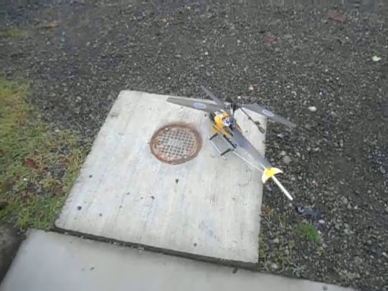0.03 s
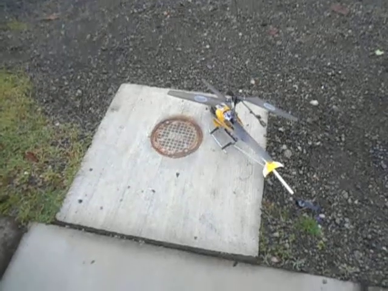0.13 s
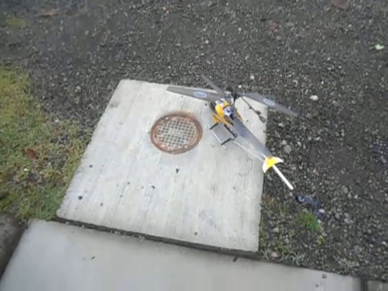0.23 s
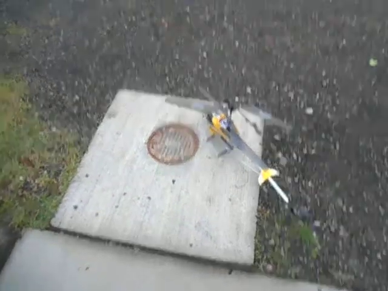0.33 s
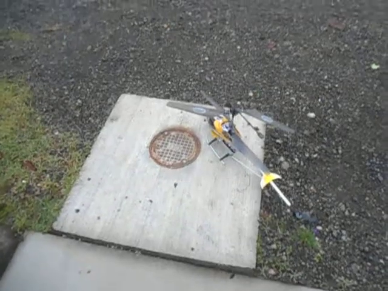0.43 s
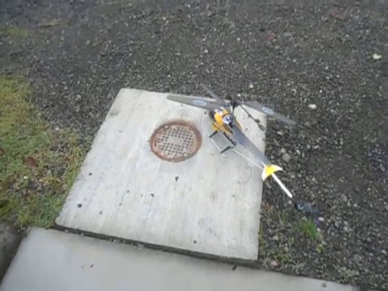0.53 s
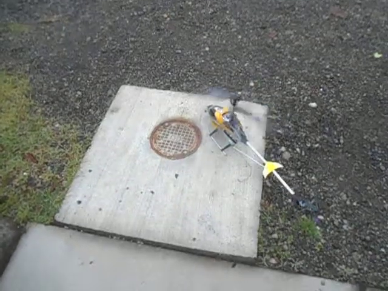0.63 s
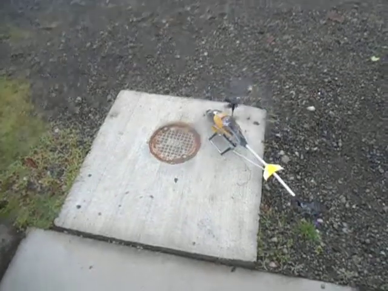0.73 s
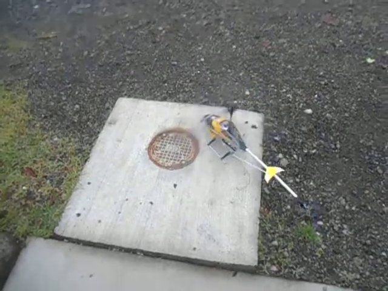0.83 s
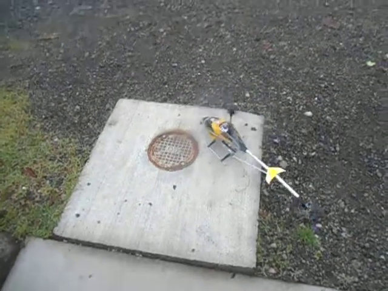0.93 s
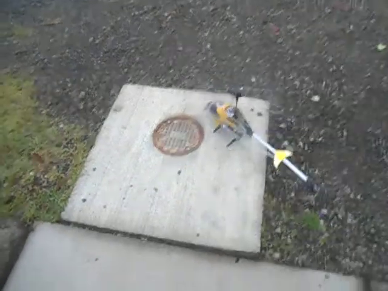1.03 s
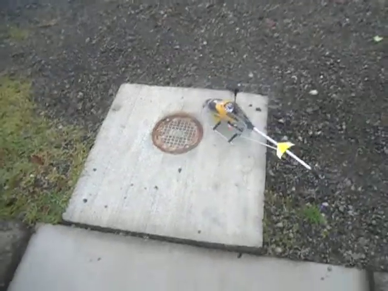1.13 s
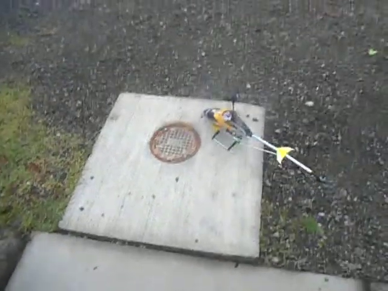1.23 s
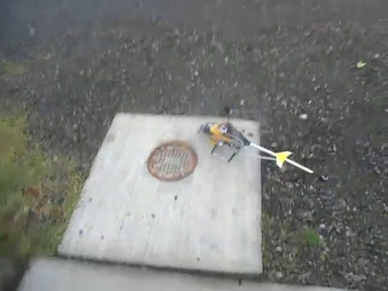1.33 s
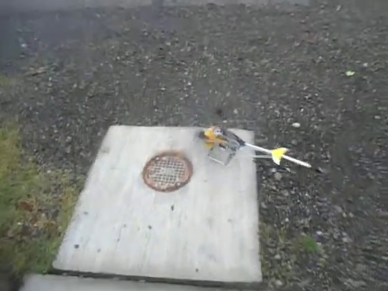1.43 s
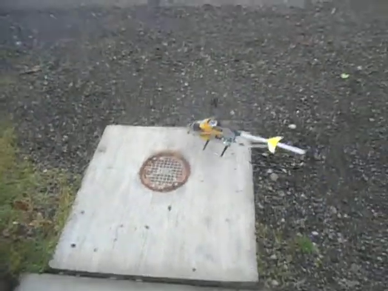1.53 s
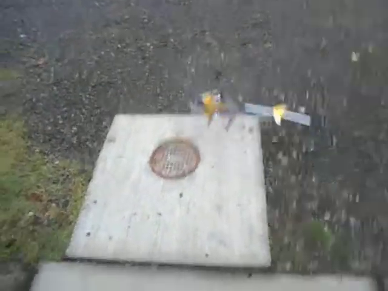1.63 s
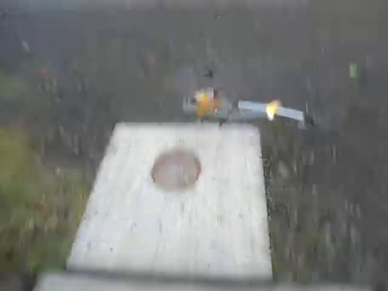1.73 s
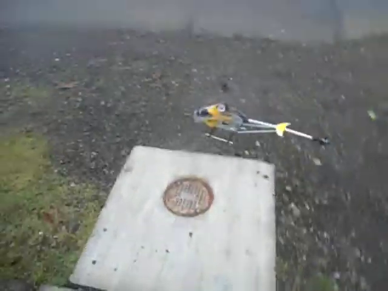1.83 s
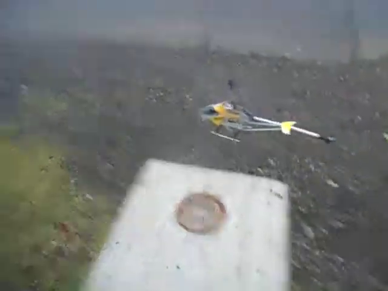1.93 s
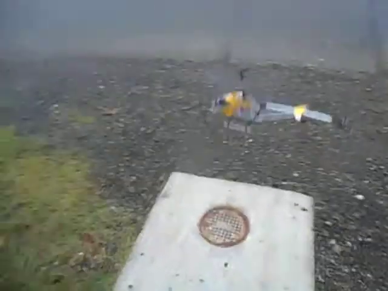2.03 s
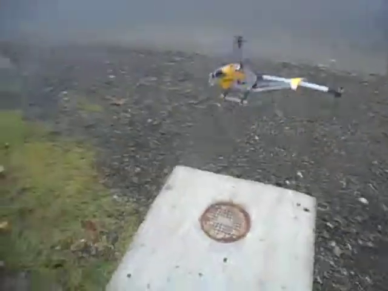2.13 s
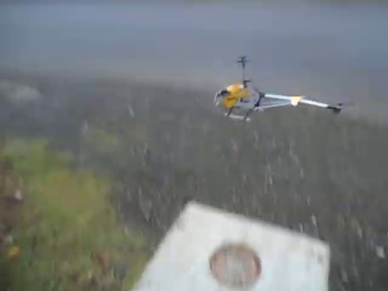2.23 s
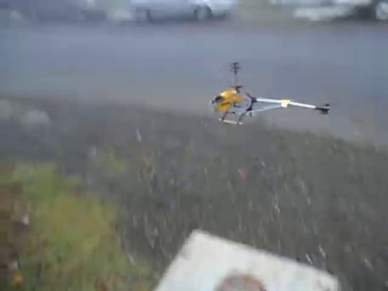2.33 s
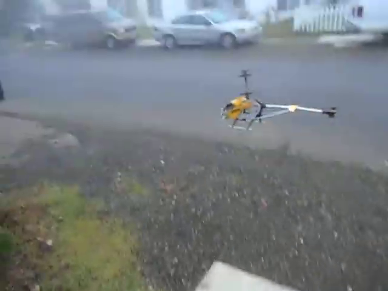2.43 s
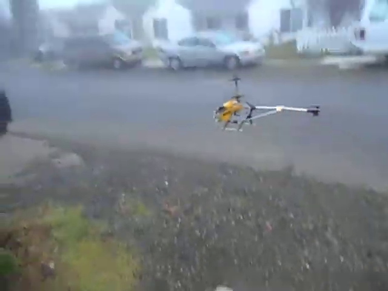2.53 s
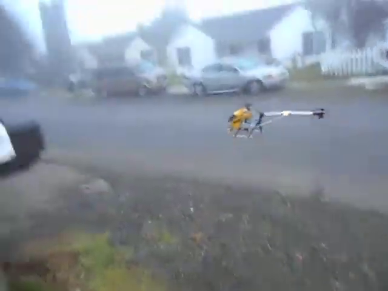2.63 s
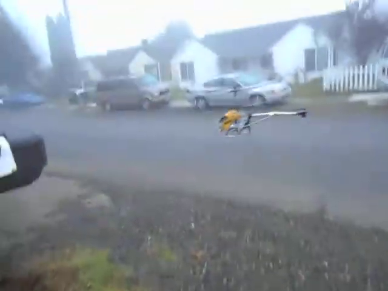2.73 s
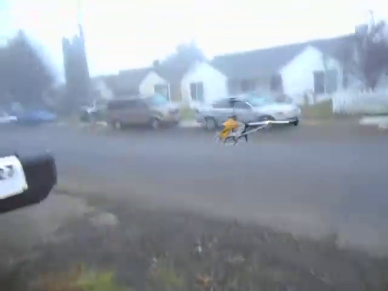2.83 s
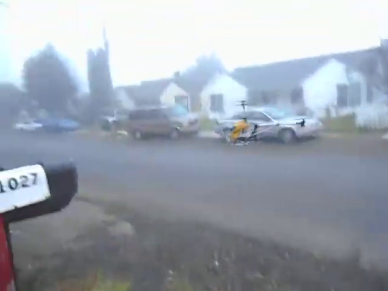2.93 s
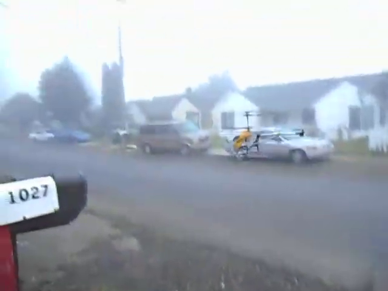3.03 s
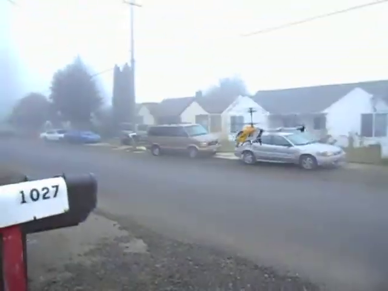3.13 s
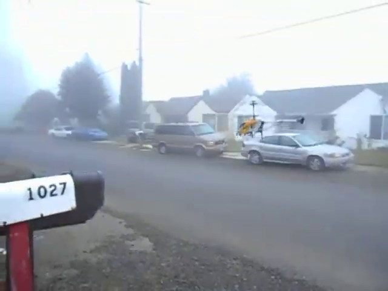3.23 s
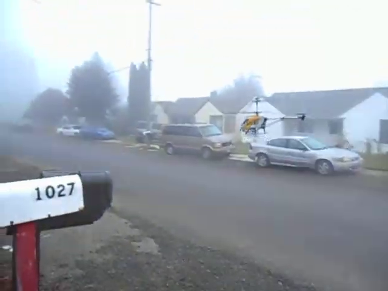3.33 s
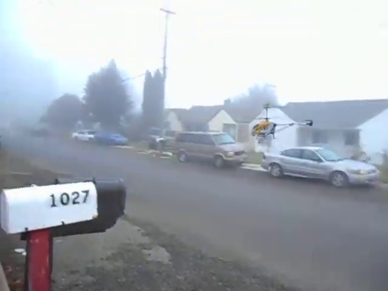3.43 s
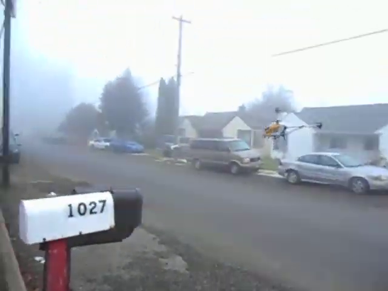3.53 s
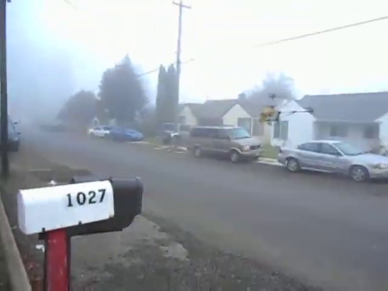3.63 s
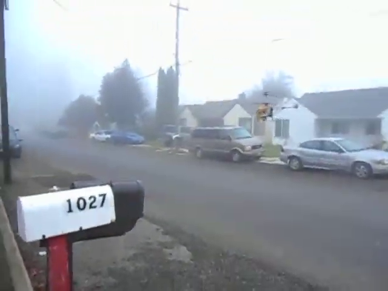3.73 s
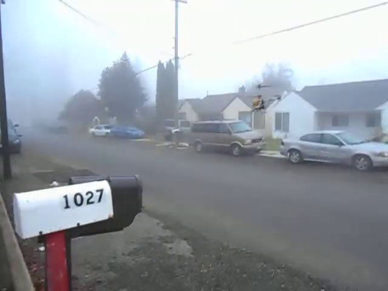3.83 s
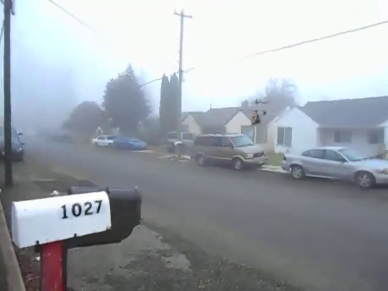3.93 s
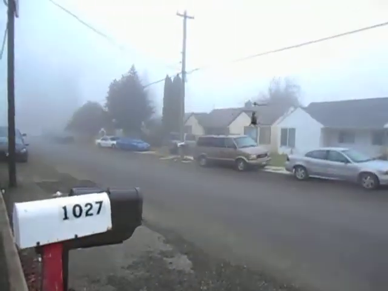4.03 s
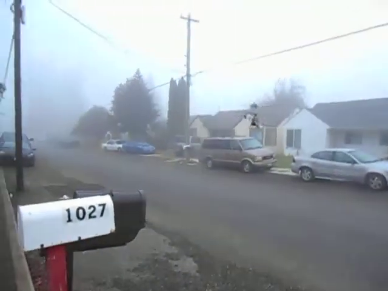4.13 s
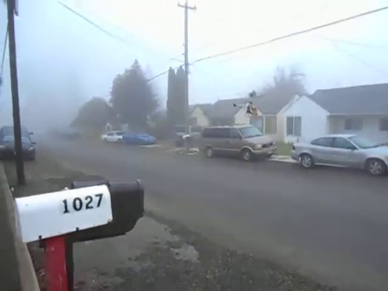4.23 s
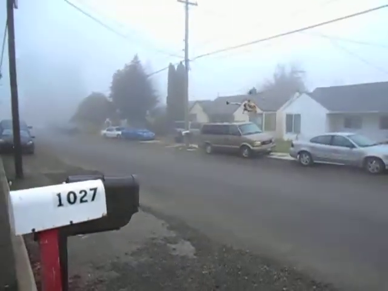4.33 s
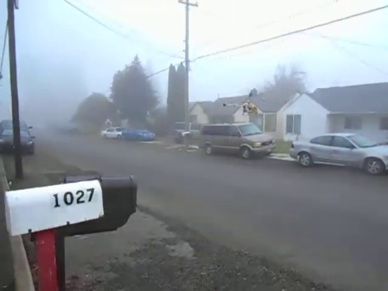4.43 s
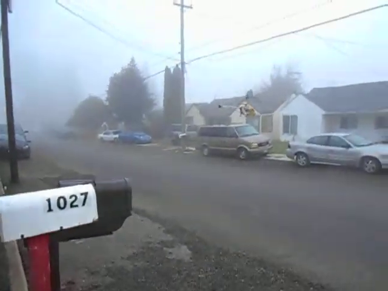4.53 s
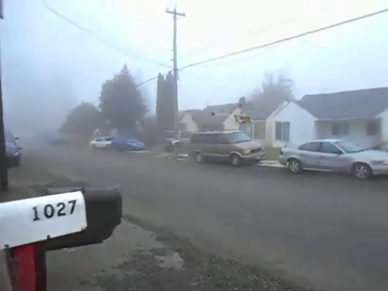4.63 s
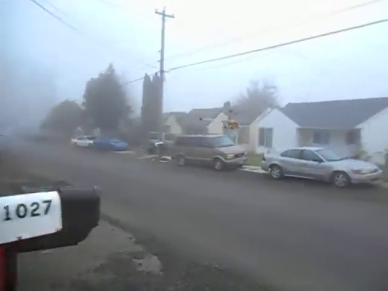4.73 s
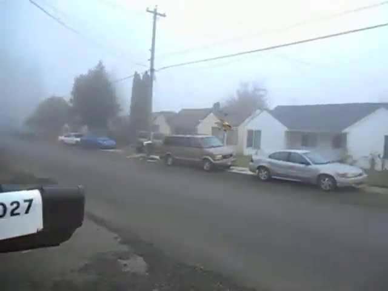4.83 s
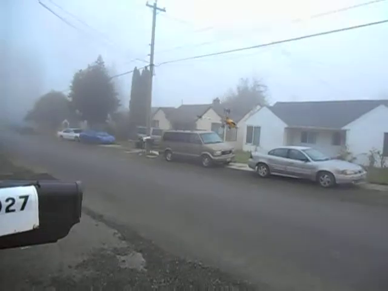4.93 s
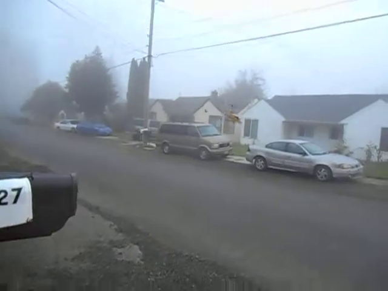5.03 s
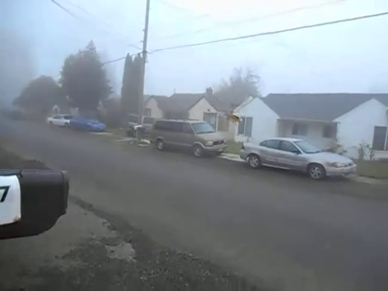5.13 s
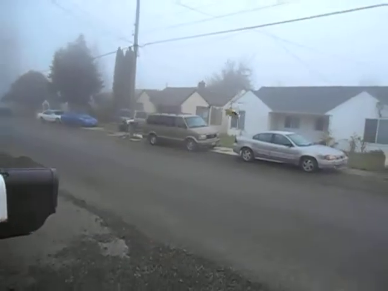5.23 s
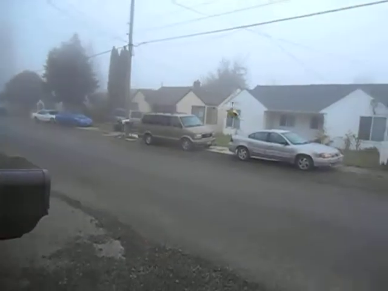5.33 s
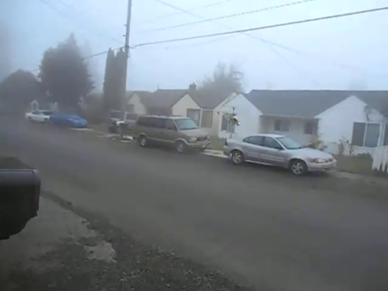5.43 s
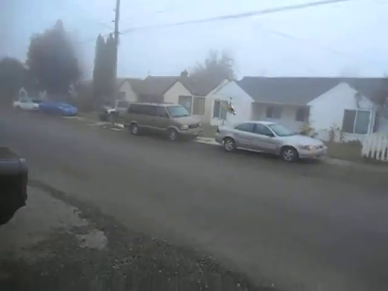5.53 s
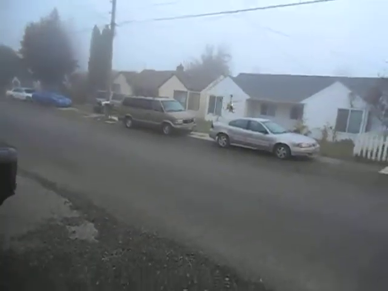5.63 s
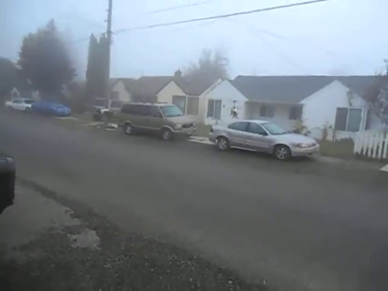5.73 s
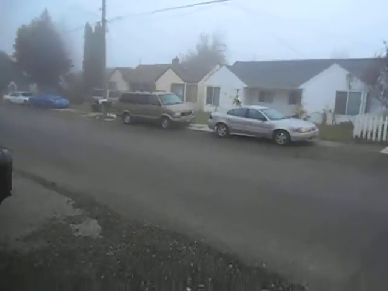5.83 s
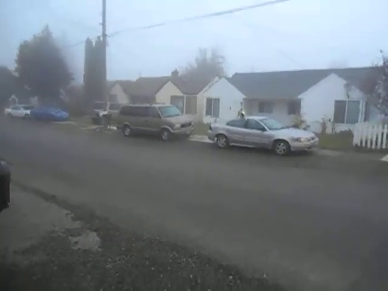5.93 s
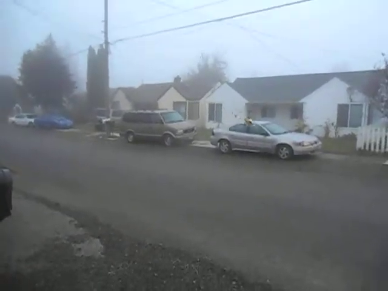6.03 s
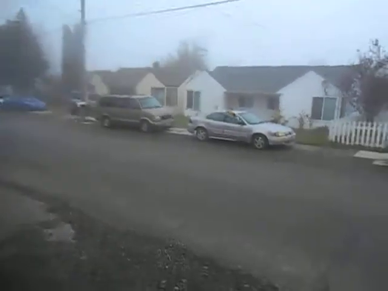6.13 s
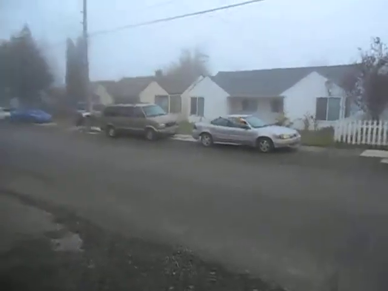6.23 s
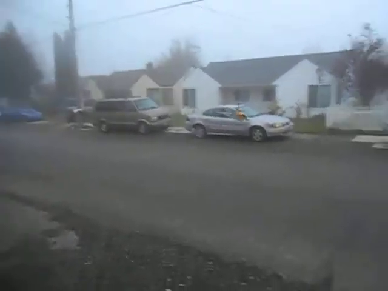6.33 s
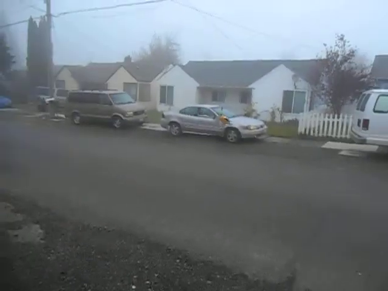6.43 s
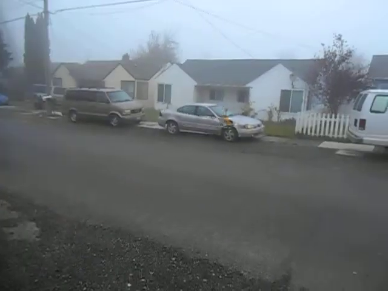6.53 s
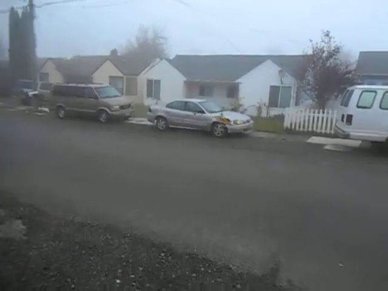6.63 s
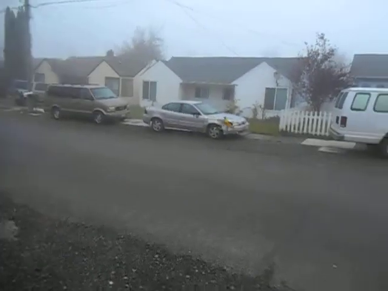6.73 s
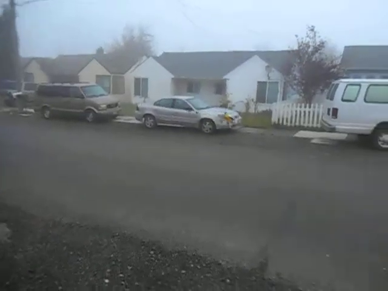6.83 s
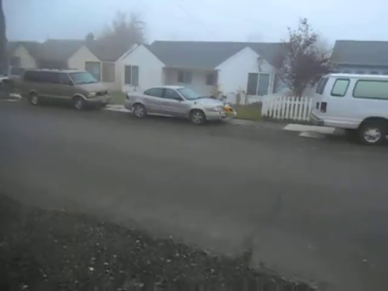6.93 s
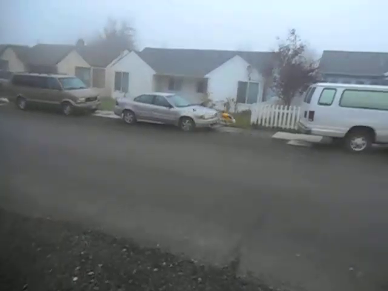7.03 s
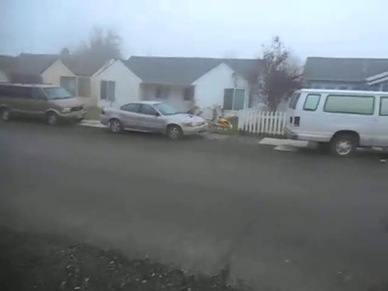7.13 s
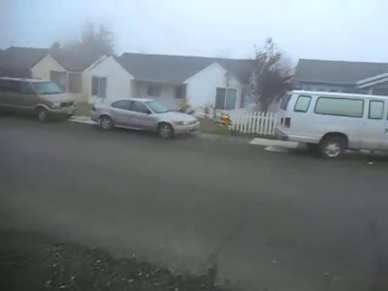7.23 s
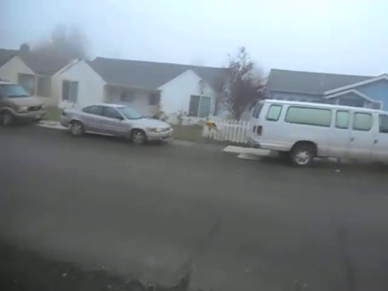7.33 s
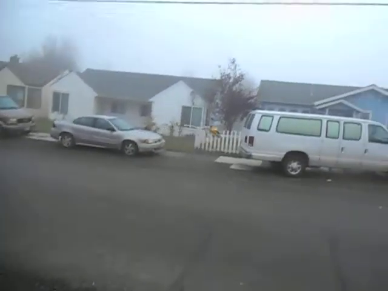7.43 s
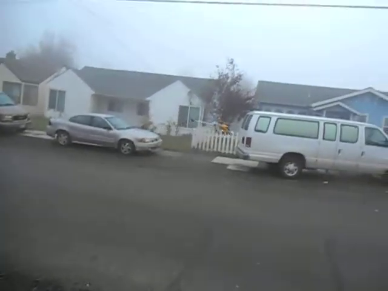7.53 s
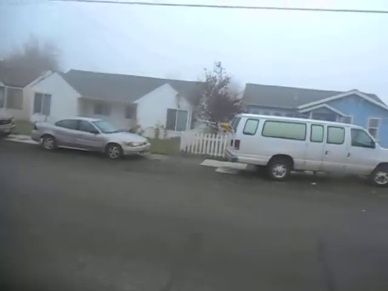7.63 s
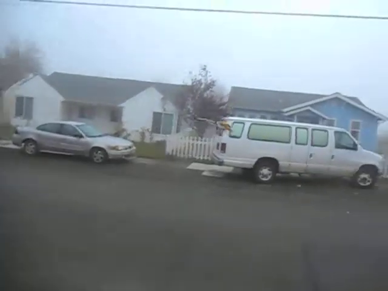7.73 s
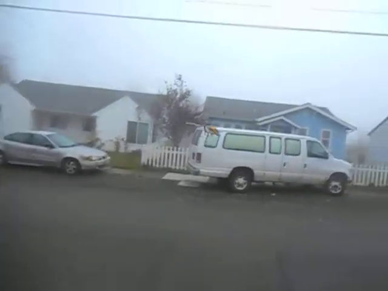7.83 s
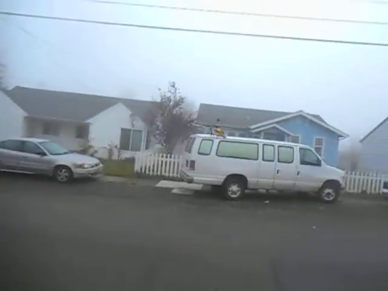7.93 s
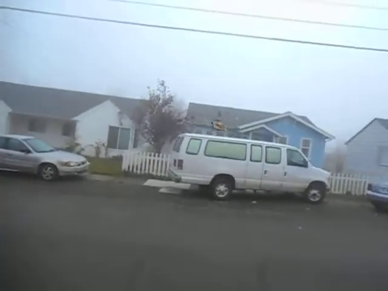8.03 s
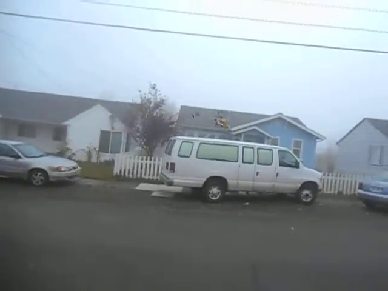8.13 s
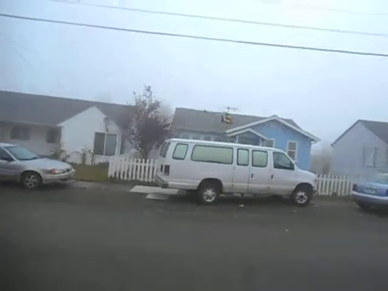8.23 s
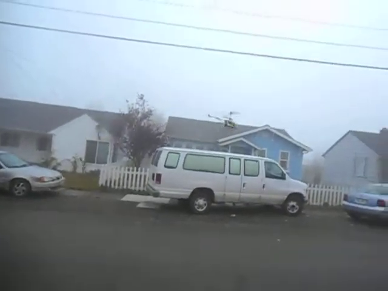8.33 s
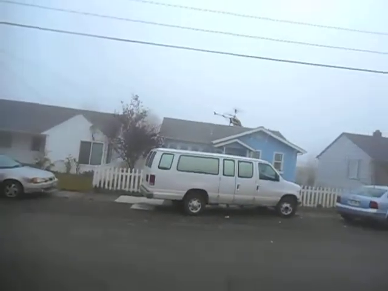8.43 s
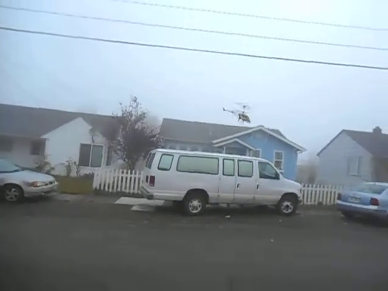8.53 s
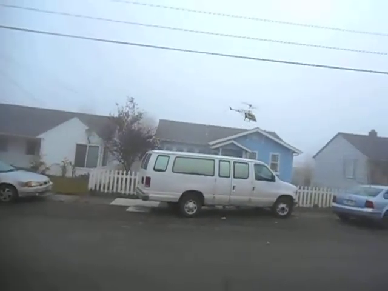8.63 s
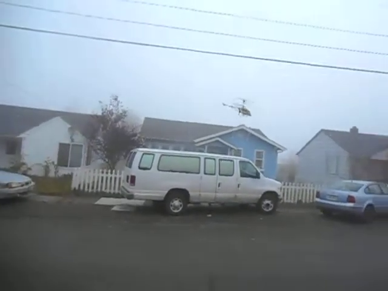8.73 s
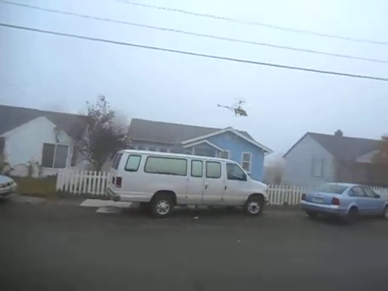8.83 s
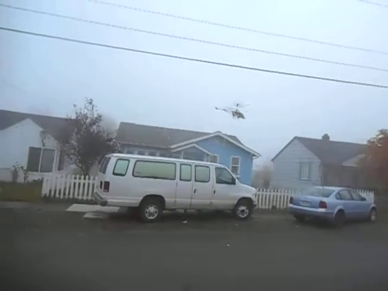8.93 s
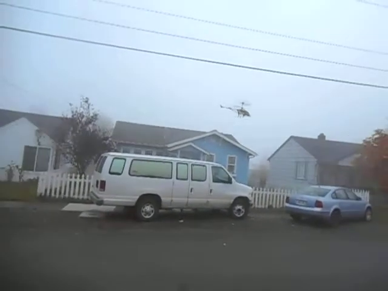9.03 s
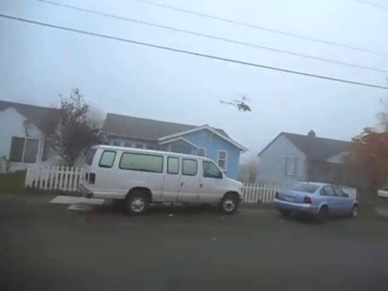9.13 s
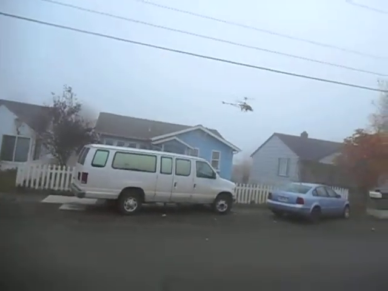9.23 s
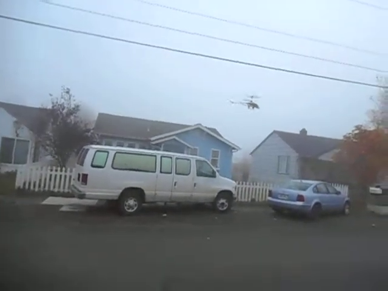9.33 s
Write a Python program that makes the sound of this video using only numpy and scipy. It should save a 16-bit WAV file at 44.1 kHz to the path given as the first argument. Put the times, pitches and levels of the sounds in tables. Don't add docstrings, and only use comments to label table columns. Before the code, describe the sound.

On a quiet street, light plastic ticks and a creak come from a handheld controller close to the microphone. Gears clatter, two tiny electric motors spool up quickly, and a toy helicopter lifts off with a harsh, rattling whine and soft rotor thump. It flies on with wavering pitch, small knocks, and one sharp, clipping snap past the middle. A small, dull microphone captures everything in mono.

```python
import sys
import numpy as np
from scipy import signal
from scipy.fft import rfft, irfft, next_fast_len
from scipy.io import wavfile
from scipy.ndimage import uniform_filter1d, map_coordinates

SR = 44100
rng = np.random.default_rng(int(sys.argv[2]) if len(sys.argv) > 2 else 0)


def unload_audio(sound):
    columns = np.transpose(np.atleast_2d(sound))
    steps = np.round(np.clip(columns, -1, 1) * 32767)
    wavfile.write(sys.argv[1], SR, steps.astype(np.int16))


def boost(x):
    u = np.asarray(x, float) / 20
    return 10 ** u


N = 414099
TEETH_PER_TURN, PINION_TEETH, POLES = 59, 8, 3
LIFT_OFF_S, CLIP = 1.986, .68
FIRST_START_S, SECOND_START_S, GEAR_START_S = .763, .8, .585

# (frequency [Hz], density [dB per Hz])
AIR_COLOUR = [(12, -14), (20, 5), (70, -1), (127, -3), (211, -5), (291, 0.5), (1410, -7), (1610, -5.5),
              (7610, -8), (12000, -19), (15600, -72), (22000, -120)]
# (frequency [Hz], level [dB])
HUM = [(98, -72.5), (172, -61), (198, -67.5)]
# (time [s], peak [dB], ring [Hz], crack [dB])
TICKS = [(.02, -58, 2330, -3), (.033, -42, 2150, 15), (.111, -44, 783, 1), (0.143, -33, 1490, -2.5),
         (.214, -41, 2180, -3), (.256, -40, 1275, 4), (.28, -34.5, 1800, 0), (0.294, -28, 1370, -4),
         (0.329, -28, 1600, -7), (.341, -34, 1670, -8), (.363, -41, 1800, 2), (.382, -34, 825, -7),
         (.56, -46, 818, -7), (.594, -20.5, 1920, -9), (.616, -20, 2240, -20), (0.632, -20, 2260, -13),
         (0.6568, -20, 6000, 13), (3.547, -37, 131, -30), (3.546, -19, 684, 8), (3.549, -16, 1442, -1),
          (3.585, -30.5, 398, -5), (3.839, -32, 3000, 9.5), (3.949, -31, 600, 6), (4.893, -38, 391, -9.5),
          (4.985, -41, 374, -9.5), (6.26, -27, 1052, 7), (7.804, -26.5, 627.4, -9), (8.488, -31, 477, 10),
          (8.938, -33, 706, 13), (8.953, -31, 502.4, 7)]
# (start [s], length [s], peak [dB], ring [Hz], crack [dB])
CREAKS = [
    (.404, .049, -24, 676, -9.5),
    (6.281, 0.033, -25, 600, 4),
]
# (frequency [Hz], density [dB per Hz])
SNAP_COLOUR = [(47, -61), (80, -24), (920, -12.5), (2000, -16), (2710, -5.5), (4360, -12), (4750, 2.5),
               (5770, -12.5), (8890, -13.5), (10100, -17), (14000, -56)]
# (time [s], extra path [ms])
ECHO_PATH = [(1.4, .8), (1.8, 1.7), (2.2, 2.9), (2.5, 3.68), (2.8, 4.18), (3.15, 4.53), (3.5, 4.65),
             (3.85, 4.47), (4.4, 3.86), (4.8, 3.58), (5.6, 3.28), (6.4, 2.86), (6.9, 2.69), (7.2, 2.9),
             (7.6, 3.44), (8.0, 4.15), (8.4, 4.63), (9.39, 5.05)]
# (multiple of rotor rate [1], level [dB])
BLADE_ORDERS = [(1, -7), (2, 3), (3, -4), (4, 0), (5, -19), (6, -10.5)]
# (time [s], rattle [dB], treble tilt [dB])
JOLT = [
    (.585, -55, 2),
    (.597, -36.5, 13),
    (.625, -30, 5),
    (.65, -30, 16.5),
    (.665, -35.5, 9),
    (.7, -31.5, -1),
    (.755, -37, -1),
    (.775, -31, 8),
]
# (time [s], rattle [dB], treble tilt [dB])
RATTLE = [(0.819, -29, 7), (.98, -33, 13), (1.32, -31, 13), (1.82, -34.5, 8.5), (2.1, -33.5, 14.5),
          (2.7, -35.5, 11), (3.5, -33.5, 13.5), (4.2, -36, 8), (4.78, -36.5, 12), (5.55, -38.5, 10.5),
          (5.64, -42, 7), (5.86, -40.5, 8), (6.74, -36.5, 15.5), (7.36, -35, 14), (7.86, -33, 8),
          (8.67, -35, 7), (8.89, -33, 9.5), (9.39, -37, 6.5)]
# (frequency [Hz], density [dB per Hz])
RATTLE_COLOUR = [(240, -28.5), (450, -22.5), (900, -13), (1440, -10.5), (1600, -5), (2100, -0.5), (2450, 2),
                 (3000, -3), (4000, -2), (5500, 1), (6300, -1), (7800, 5.5), (10000, 1.5), (12500, -20)]
# (frequency [Hz], width [Hz], gain [dB])
SHELL = [(1693, 4.9, 10), (1770, 290, 2.5), (8160, 1460, 4.5)]
# (time [s], asked tooth mesh [Hz], whine [dB])
SECOND = [(.8, 2387, -62), (.95, 2359, -28.5), (1.2, 2417, -28.5), (1.6, 2575, -38), (2.3, 2524, -36.5),
          (3.5, 2369, -41), (3.75, 2215, -34), (3.95, 2189, -34), (4.4, 2316, -39), (5.5, 2326, -35.5),
          (5.75, 2497, -38), (6.1, 2438, -47), (6.3, 2644, -38.5), (6.5, 2612, -67), (7.1, 2599, -33),
          (7.9, 2584, -31), (8.4, 2418, -37.5), (9.39, 2322, -32)]
# (time [s], asked tooth mesh [Hz], whine over rattle [dB], brush sparking [dB])
FIRST = [(.763, 2482, 2, -8), (1.88, 2496, 3, -2.5), (2.25, 2392, 4, -4.5), (2.53, 2284, 4, -7),
         (3.2, 2260, 1.5, -7), (3.64, 2211, 4, -8.5), (4.0, 2293, 0, -9), (4.38, 2401, 4.5, -6),
         (5.3, 2434, 3.5, -3.5), (5.65, 2319, -1, -5), (6.3, 2302, 1, -7.5), (6.36, 2400, 4, -2),
         (6.61, 2462, 4, -6.5), (7.93, 2448, 4.5, -7.5), (8.44, 2241, 0, -9), (8.68, 2284, 1.5, -6.5),
         (9.02, 2210, -0.5, -14.5), (9.39, 2322, 0.5, -5.5)]
# (start [s], rise [s], hold [s], fall [s], mesh change [Hz])
NUDGES = [
    (1.19, .05, .06, .2, 65),
    (3.64, .035, .06, .27, 185),
    (5.647, 0.072, 0.64, 0.3, -150),
    (6.195, 0.014, 0.14, 0.016, -145),
    (8.68, .1, 0.004855, .24, 206.5),
    (9.021, 0.029, .15, 0.19, 150),
]
MESH_ORDERS_DB = [0.11, 2.63, .1, .1]
SLACK_DB_PER_HZ = [0.0018, 0.019, -0.018, 0.0018]
# (frequency [Hz], gain [dB])
RADIATION = [(1700, -0.4), (5000, 2), (6500, -4), (6950, 9), (7500, 8.5), (8850, 7.5), (9450, -2.5),
             (10000, -1)]


def rms_one(x):
    return x / np.sqrt(np.mean(np.abs(x) ** 2) + 1e-20)


def in_time(rows):
    s, *columns = np.transpose(rows)
    return [np.interp(np.arange(N) / SR, s, c) for c in columns]


def after(start_s):
    return np.arange(N) > start_s * SR


def turns(hz):
    return 2 * np.pi * np.cumsum(hz) / SR


def swell(start_s, rise_s, hold_s, fall_s, height):
    corners_s = start_s + np.cumsum([0, rise_s, hold_s, fall_s])
    return np.interp(np.arange(N) / SR, corners_s, [0, height, height, 0])


def fade_in(start_s, rise_s, depth_db):
    return np.interp(np.arange(N) / SR, [start_s, start_s + rise_s], [-depth_db, 0])


def drift(rate_hz, count, hold=32):
    r = np.exp(-64 * np.pi * rate_hz / SR)
    noise = rng.standard_normal((count, N // 32 + 1001))
    slow = signal.lfilter([1], [1, -2 * r, r * r], noise)[:, 1000:]
    length = -(-N * hold // 32)
    return np.repeat(rms_one(slow), hold, axis=1)[:, :length]


def coloured(x, points, peaks=()):
    size = next_fast_len(len(x))
    hz = np.arange(size // 2 + 1) * SR / size + 1
    point_hz, point_db = np.transpose(points)
    db = np.interp(np.log(hz), np.log(point_hz), point_db)
    for at_hz, width_hz, top_db in peaks:
        db = db + top_db / (1 + (2 * (hz - at_hz) / width_hz) ** 2)
    return rms_one(irfft(rfft(x, size) * boost(db), size)[:len(x)])


def street():
    air_db = -54.5 + 1.5 * drift(6.0, count=1)[0]
    out = coloured(rng.standard_normal(N), AIR_COLOUR) * boost(air_db)
    for (hz, db), wander in zip(HUM, drift(1.47, count=len(HUM))):
        out += boost(db + 2.2 * wander) * np.sin(turns(hz + .8 * wander))
    return out


def case_hit(db, hz, crack_db):
    t = np.arange(1500) / SR
    case = signal.butter(2, [800, 7500], "band", fs=SR, output="sos")
    grip = signal.butter(2, [950, 2100], "band", fs=SR, output="sos")
    cycles, crack_hz = t * hz, 2.39 * hz
    ring = 2.0 * np.sin(2 * np.pi * cycles) * cycles * np.exp(-cycles / 0.92)
    rub = signal.sosfilt(grip, rng.standard_normal(len(t))) * t / .003 * np.exp(1 - t / .003)
    sharp = np.exp(-t / .002) * (1 - np.exp(-t / .0002))
    crack_noise = signal.sosfilt(case, rng.standard_normal(len(t)))
    crack = sharp * (.8 * crack_noise + .3 * np.sin(2 * np.pi * crack_hz * t))
    return boost(db) * (ring + 0.91 * rub + boost(crack_db + 6.0) * crack)


def snap(peak_db=-2.1, t60_s=0.042):
    t = np.arange(5000) / SR
    envelope = boost(peak_db - 60 * t / t60_s) * (1 - np.exp(-t / 0.00028))
    burst = coloured(rng.standard_normal(len(t)), SNAP_COLOUR) * envelope
    thud = boost(-34) * np.sin(2 * np.pi * 160 * t) * np.exp(-t / 0.013)
    return burst + thud


def controller():
    out = np.zeros(N + SR)
    slips = [(s + length_s * (k / 3) ** .85, *rest) for s, length_s, *rest in CREAKS for k in range(4)]
    for s, db, hz, crack_db in TICKS + slips:
        out[round(s * SR):][:1500] += case_hit(db, hz, crack_db)
    out[round(5.5685 * SR):][:5000] += snap()
    return signal.sosfilt(signal.butter(2, 90, "high", fs=SR, output="sos"), out[:N] + 1e-18)


def ground(direct):
    lag_ms = uniform_filter1d(in_time(ECHO_PATH)[0], size=8000)
    dull = signal.sosfiltfilt(signal.butter(1, [1000, 4000], "band", fs=SR, output="sos"), direct)
    late = np.interp(np.arange(N) - lag_ms * SR / 1000, np.arange(N), dull)
    return direct - boost(-5 - 1.5 * np.abs(lag_ms - 3)) * late


def downwash(start_db):
    rush_db = -60.5 + swell(start_s=0.59, rise_s=0.56, hold_s=0.31, fall_s=1, height=16.5) + start_db
    rush_db = rush_db + 1.5 * drift(.6, count=1)[0] + 1.3 * drift(14.0, count=1)[0]
    band = signal.butter(2, [170, 750], "band", fs=SR, output="sos")
    return rms_one(signal.sosfilt(band, rng.standard_normal(N))) * boost(rush_db)


def blades(rotor, asked_hz, start_db):
    thump_db = -70 + 1.7 * (asked_hz / TEETH_PER_TURN - 41.25) + start_db
    thump_db = thump_db + swell(start_s=1.02, rise_s=0.64, hold_s=0.51, fall_s=1.83, height=13.3)
    near_slab_db = 13 / (1 + np.exp((np.arange(N) / SR - LIFT_OFF_S) / 0.054))
    out = np.zeros(N)
    for (k, db), wander in zip(BLADE_ORDERS, drift(0.8, count=len(BLADE_ORDERS))):
        out += boost(db + 1.5 * wander + (k == 6) * near_slab_db) * np.sin(k * rotor)
    return boost(thump_db - 2) * out


def tone(phase, rotor, wobble, flutter_db, rough):
    turn = rotor[::8]
    depth, lag, second, fade = drift(2.0, count=4, hold=4)
    quick, blur = drift(29.0, count=2, hold=4)
    chop, jitter = drift(138.0, count=2, hold=4)
    swing = wobble * ((1 + .22 * depth) * np.sin(turn + lag) + .4 * np.sin(2 * turn + 1.2 * second))
    swing = swing + rough * (1.1 * blur + 0.84 * jitter)
    pulse = 1 + 0.22 * np.cos(turn + 1.38 * second)
    gain = boost(flutter_db * (.4 * fade + .5 * quick + .9 * chop)) * pulse
    gain, swing = np.repeat(gain, 8)[:N], np.repeat(swing, 8)[:N]
    return rms_one(gain * np.sin(phase + swing))


def bearing(rotor, start_db):
    whistle_db = -57.5 + swell(start_s=1.5, rise_s=0.34, hold_s=2.0, fall_s=1.27, height=12.7) + start_db
    return boost(whistle_db) * sum(tone(k * rotor, rotor, wobble=.6, flutter_db=3, rough=.12) for k in (41, 42))


def rattle(rotor, level_db, treble_db, repeat=0.29):
    turn = rotor / (2 * np.pi)
    patterns = rng.standard_normal((90, 600))
    same = map_coordinates(patterns, [np.arange(N) * 88 / N, turn % 1 * 599], order=1)
    grains = rng.standard_normal(N) * boost(2.03 * drift(240.0, count=1)[0])
    contacts = (repeat * rms_one(same) + (1 - repeat) * grains) * (1 + 0.038 * np.cos(rotor))
    slack_db = .6 + 2.5 * (np.arange(N) < .652 * SR)
    body = coloured(contacts * boost(slack_db * drift(77.0, count=1)[0]), RATTLE_COLOUR, SHELL)
    high = signal.sosfiltfilt(signal.butter(2, 6500, "high", fs=SR, output="sos"), body)
    return after(GEAR_START_S) * boost(level_db + 10.5) * (body - high + boost(treble_db - 12.5) * high)


def spool(start_s, missing, lag_s):
    return 1 - missing * np.exp(-np.maximum(np.arange(N) / SR - start_s, 0) / lag_s)


def second_motor(mesh_hz, db, rotor, brush_db):
    mesh, fast = turns(mesh_hz), mesh_hz > 2150
    whine = tone(mesh, rotor, wobble=.85, flutter_db=2.2, rough=.14)
    commutator = tone(mesh * POLES / PINION_TEETH, rotor, wobble=0.2, flutter_db=5.5, rough=0.41)
    whine += boost(-0.5) * tone(3 * mesh, rotor, wobble=3.3, flutter_db=0.0, rough=0.59) * fast
    return boost(db) * whine * after(SECOND_START_S) + boost(brush_db - 5) * commutator * fast


def first_motor(mesh_hz, nudge_hz, whine_db, brush_db):
    bite_db = swell(start_s=.84, rise_s=.14, hold_s=.1, fall_s=.1, height=3)
    hz, gain_db = np.transpose(RADIATION)
    levels_db = []
    for k, db, slack in zip(range(1, 5), MESH_ORDERS_DB, SLACK_DB_PER_HZ):
        radiated_db = np.interp(np.log(k * mesh_hz), np.log(hz), gain_db)
        levels_db.append(whine_db + db + slack * nudge_hz + (k - 2) * bite_db + radiated_db)
    levels_db.append(-25 - np.abs(5 * mesh_hz - 8500) / 300 - 40 * after(1.15))
    levels_db.append(-31 - np.abs(6 * mesh_hz - 9000) / 160 - 40 * (mesh_hz > 1750))
    mesh = turns(mesh_hz)
    rotor = mesh / TEETH_PER_TURN
    loaded = np.clip((mesh_hz[::8] - 1950) / 450, .62, 1)
    play = .15 + .03 * bite_db[::8]
    out = np.zeros(N)
    for k, db in enumerate(levels_db, 1):
        out += boost(db - 1.5) * tone(k * mesh, rotor, loaded * (0.24 + 0.85 * k), 2.83, play * k)
    commutator = tone(mesh * POLES / PINION_TEETH, rotor, wobble=0.74, flutter_db=2.5, rough=play)
    return after(FIRST_START_S) * (out + boost(brush_db - 4) * commutator)


def scene():
    rattle_db, treble_db = in_time(JOLT + RATTLE)
    first_asked_hz, whine_db, spark_db = in_time(FIRST)
    second_asked_hz, second_db = in_time(SECOND)
    nudge_hz = sum(swell(*nudge) for nudge in NUDGES)
    first_hz = first_asked_hz * spool(FIRST_START_S, missing=.53, lag_s=.31) + nudge_hz
    second_hz = second_asked_hz * spool(SECOND_START_S, missing=.56, lag_s=.38)
    rotor = turns((second_hz + .3 * (first_hz - second_hz)) / TEETH_PER_TURN)

    brush_db = rattle_db + spark_db + 0.014 * nudge_hz + fade_in(start_s=1.13, rise_s=0.72, depth_db=22)
    whine_db = rattle_db + whine_db + fade_in(start_s=.77, rise_s=.1, depth_db=10)
    start_db = fade_in(start_s=0.63, rise_s=0.68, depth_db=17)
    air = street() + downwash(start_db) + blades(rotor, second_asked_hz, start_db)
    craft = bearing(rotor, start_db) + rattle(rotor, rattle_db, treble_db)
    craft += second_motor(second_hz, second_db, rotor, brush_db)
    craft += first_motor(first_hz, nudge_hz, whine_db, brush_db)
    return (ground(craft) + air + controller())[None]


def top_cut(x):
    return signal.sosfilt(signal.butter(12, 15820, fs=SR, output="sos"), x)


def record(dry):
    x = np.clip(dry, -CLIP, CLIP)
    x = signal.sosfilt(signal.butter(5, 10600, fs=SR, output="sos"), x)
    x = signal.sosfilt(signal.cheby2(10, 45, 13200, fs=SR, output="sos"), x)
    mix = np.clip(x, -CLIP, CLIP)
    return top_cut(mix)


dry = scene()
out = record(dry)
unload_audio(out)
```